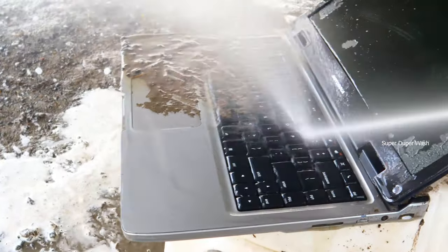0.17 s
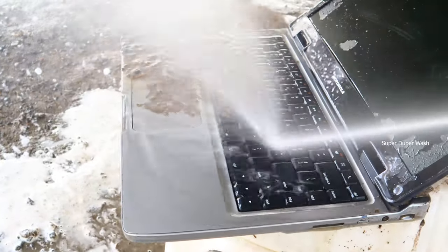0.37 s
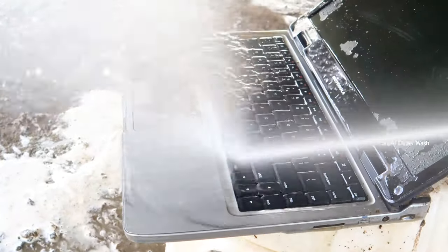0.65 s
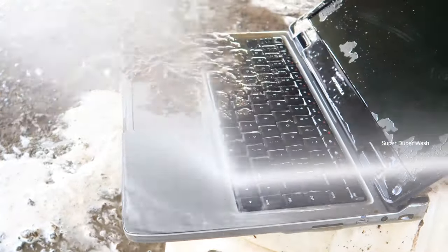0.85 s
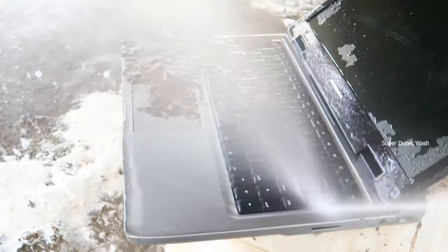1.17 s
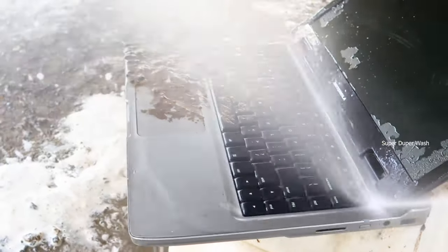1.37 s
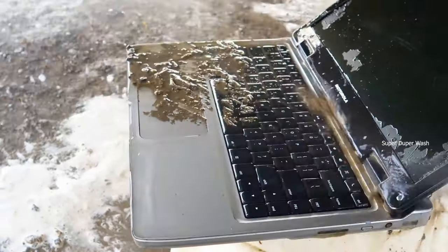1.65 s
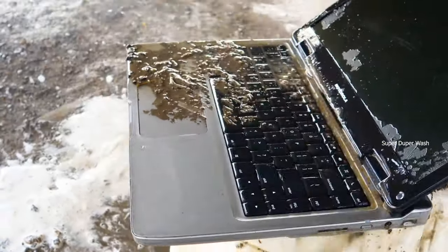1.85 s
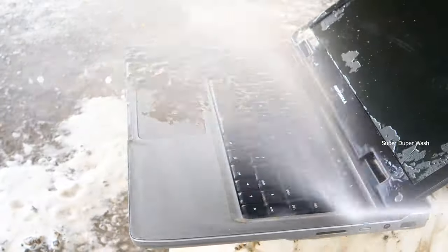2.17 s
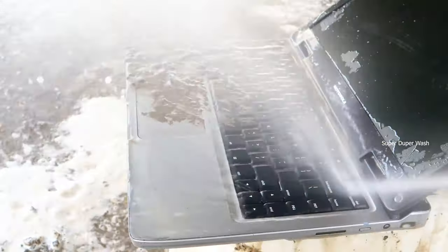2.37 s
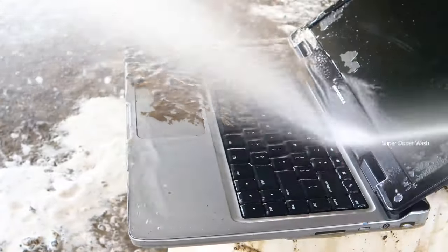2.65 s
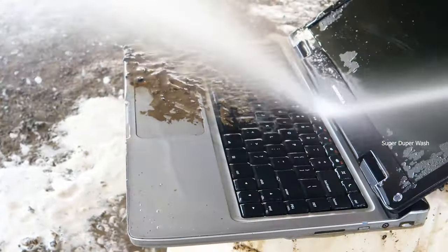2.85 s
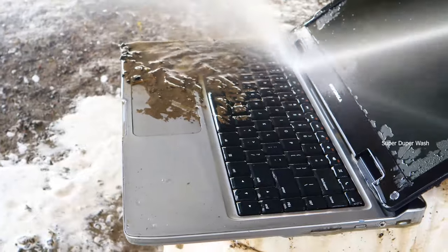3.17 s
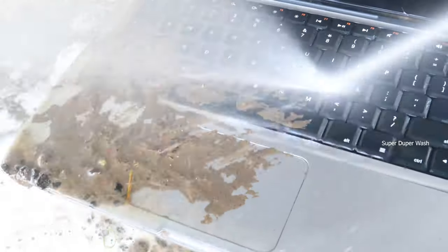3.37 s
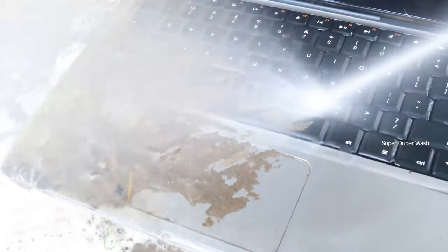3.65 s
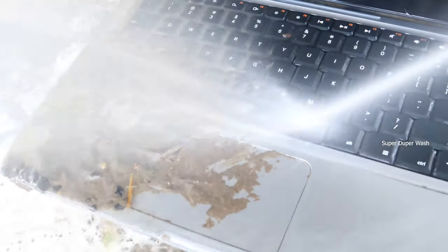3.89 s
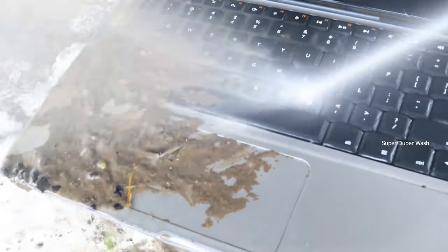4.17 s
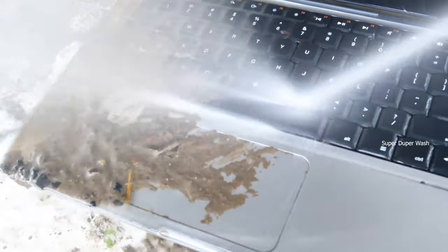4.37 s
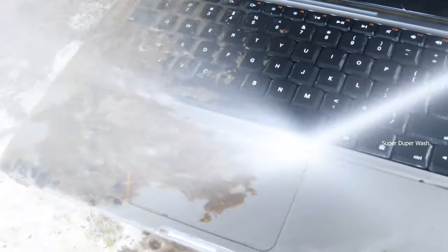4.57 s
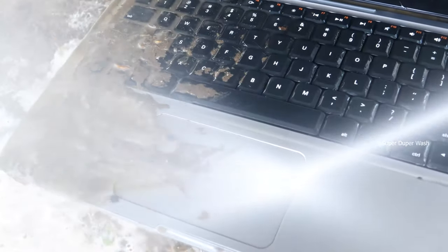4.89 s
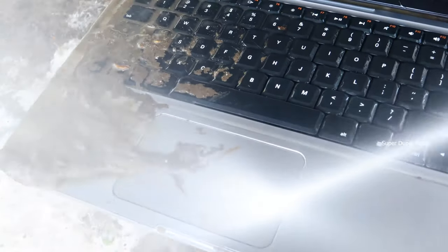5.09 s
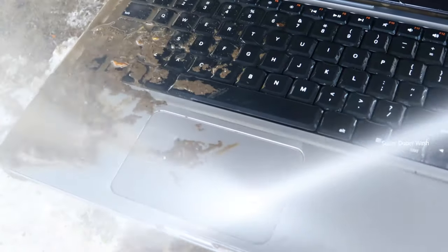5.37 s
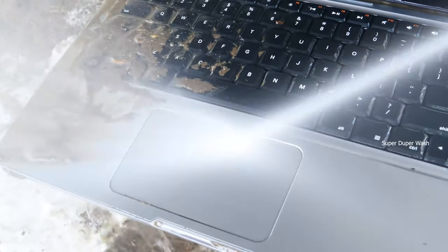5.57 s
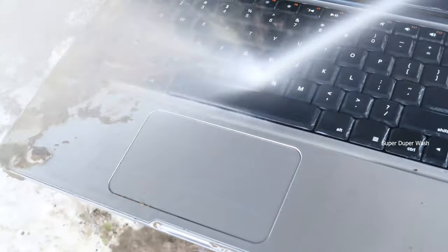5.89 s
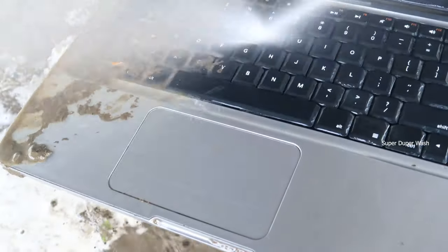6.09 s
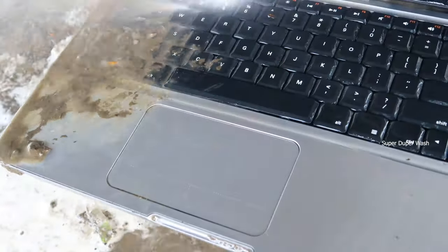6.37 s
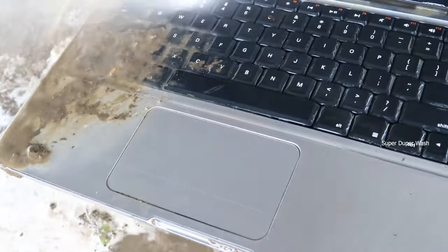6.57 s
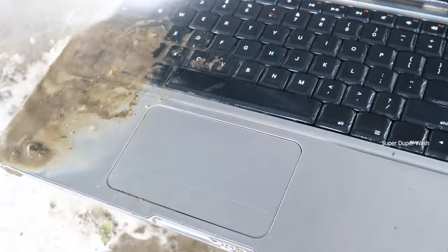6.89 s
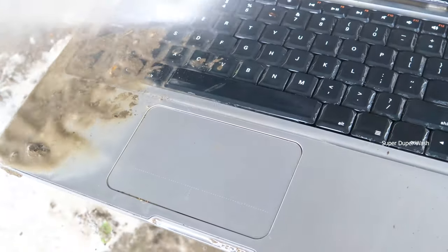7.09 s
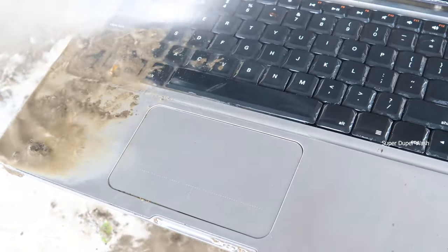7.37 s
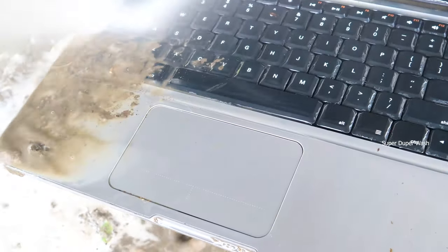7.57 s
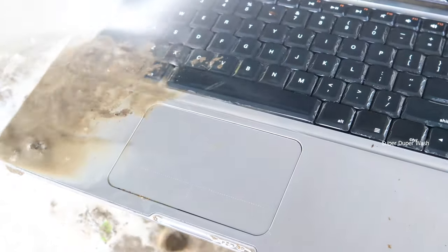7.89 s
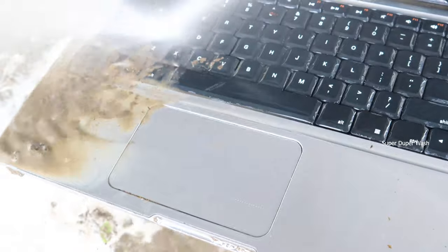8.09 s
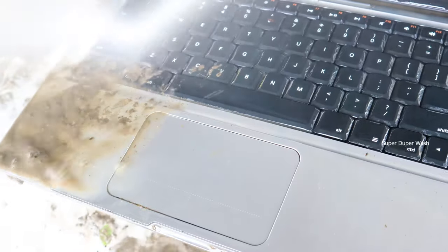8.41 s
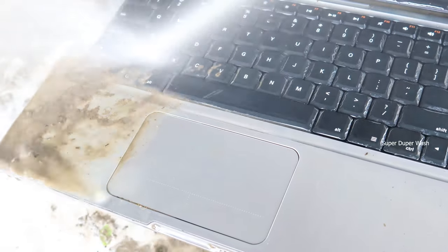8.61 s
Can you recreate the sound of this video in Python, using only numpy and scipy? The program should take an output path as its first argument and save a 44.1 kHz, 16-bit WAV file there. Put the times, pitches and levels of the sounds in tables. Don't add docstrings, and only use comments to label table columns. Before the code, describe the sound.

A pressure-washer jet hisses fiercely over a laptop keyboard outdoors, throbbing and shifting in tone, above a steady motor hum and low roar.

```python
import sys
import numpy as np
from scipy import signal
from scipy.fft import rfft, irfft, next_fast_len
from scipy.io import wavfile
from scipy.ndimage import uniform_filter1d, map_coordinates

SR = 44100
rng = np.random.default_rng(int(sys.argv[2]) if len(sys.argv) > 2 else 0)


def invert_db(x):
    u = np.asarray(x, float) / 20
    return 10 ** u


def wav_record(signal):
    frames = np.transpose(np.atleast_2d(signal))
    bounded = np.clip(frames, -1, 1)
    quanta = np.round(bounded * 32767).astype(np.int16)
    wavfile.write(sys.argv[1], SR, quanta)


N = 385434
HOP = 192

SCENE_CHANGES = [3.396, 5.832]
# (time [s], force of impact [dB], fineness of spray [dB], water pooled on the case [dB])
HAND = [(0.0, -3.5, -0.5, 5), (0.2, 0.95, -1.5, -0.5), (0.9, 2.5, -1.5, 3), (1.3, -0.8, 1.7, 0),
        (1.62, -3, -0.5, 1), (2.15, -4, -1.1, -0.8), (2.45, 1.6, -1.2, 1.5), (2.72, -3.5, -8, 1.5),
        (3.05, -4, -1.5, 4.5), (3.393, -6.5, -3.2, 4), (3.399, -1.1, -1.0, -1.5), (4.45, 0.5, 1, -1.5),
        (4.72, -5.5, -0.3, 2), (5.5, -6.5, -0.4, 2.3), (5.828, -3.5, -2, 6.5), (5.836, 1.5, -0.5, 1.4),
        (6.85, 0.2, 1.8, -0.4), (8.74, 2.05, -1.5, -1)]
# (time [s], left lag [microseconds], left-right likeness [0-1], left-right level [dB])
AIM = [(0.0, 33, 0.4, -7), (0.55, 21, 0.63, -3), (0.85, -22, 0.5, -2), (1.07, 9, 0.46, -3),
       (1.61, 54, 0.66, -7), (2.05, 43, 0.56, -5), (2.66, 46, 0.36, -6), (2.8, 32, 0.44, -7),
       (3.29, 22, 0.72, -4), (3.54, 19, 0.22, -8), (3.85, 22, 0.38, -6), (4.26, 20, 0.6, -7),
       (4.95, 15, 0.12, -5), (5.74, 25, 0.68, -3.5), (5.98, -1, 0.47, -4), (6.11, -10, 0.62, -4.5),
       (6.97, -29, 0.55, 0.5), (8.74, -30, 0.67, 0.5)]
# (resting level [dB], per dB of force [dB], per dB of fineness [dB], per dB of pooling [dB])
ANSWER = [
    (-34, 0.26, 0.31, 1.07),
    (-25, 1.11, -1.02, 0.17),
    (-24.5, 1.46, 0.24, -0.43),
    (-21, 0.85, 1.2, -0.14),
]
# (time [s], length [s], force [dB], fineness [dB])
EDGES = [(0.101, 0.049, 0, -5), (0.185, 0.046, 2.5, 3.5), (0.311, 0.04, 0.8, 6.5), (0.82, 0.022, 4, 0.5),
         (1.011, 0.025, 2.5, 2.5), (1.137, 0.079, 3, 0), (1.442, 0.1, 3, 0.5), (1.601, 0.044, 1.5, 0.5),
         (1.741, 0.023, 4.5, -2), (1.813, 0.046, 4.5, -4), (1.901, 0.04, 2.4, 1.5), (1.958, 0.11, 7, -1.5),
         (2.018, 0.035, 3, -0.5), (2.094, 0.026, 7.5, -2.5), (2.257, 0.066, 1.8, 2.5), (2.475, 0.045, 1, 3),
         (2.522, 0.048, 5, 4), (2.65, 0.083, 0.5, 5), (3.2, 0.1, 3, 0.5), (3.54, 0.1, 1.5, 1.5),
         (3.755, 0.05, 1.5, 2), (4.255, 0.031, 4, -2), (4.51, 0.076, 1.1, -1.5), (5.594, 0.083, 2.5, -3.5),
         (5.886, 0.1, 2.5, -1.5), (5.971, 0.049, 1.5, 2), (6.174, 0.048, 1, -2), (6.702, 0.067, 0, 1),
         (8.24, 0.04, 0.4, 4), (5.835, 0.014, 3, 1.5), (1.264, 0.03, 2.5, 0), (1.332, 0.025, 2, 2),
         (7.623, 0.031, 2.5, 1.5), (7.937, 0.027, 2.5, 1), (6.085, .03, 2, 0), (6.127, 0.023, 0.5, 2),
         (6.22, 0.047, 1, 1), (7.466, .05, -1, 1), (2.377, .05, 0, 1.5), (0.376, .04, 1.5, -0.5),
         (8.143, 0.036, 1.5, 1), (7.818, .06, 0.5, 1), (8.556, 0.023, 0, 2.0)]
# (time [s], length [s], force [dB], fineness [dB])
GAPS = [(0.054, 0.027, -1.7, -3), (0.428, 0.035, 0, 3.5), (0.897, 0.04, 2, -1.5),
        (0.934, 0.061, -5.5, -0.5), (1.212, 0.025, 0.8, -1.5), (2.326, 0.062, -0.5, 2.5),
        (2.575, 0.071, -3.2, 3.5), (2.712, 0.05, -3, 3.1), (2.878, 0.037, -3.5, -0.2),
        (2.968, 0.069, -1.5, -1), (3.647, 0.072, -1.5, -1), (3.882, 0.12, -1.5, 0), (4.07, 0.087, -3.5, -4),
        (4.176, 0.15, -2, -0.5), (4.357, 0.078, -4, -2), (4.57, 0.027, -2, -3), (4.87, 0.083, -2, -1),
        (5.024, 0.09, -1.5, -2), (6.837, 0.04, -1.3, -3), (6.942, 0.025, -1.5, -3.5),
        (7.051, 0.05, -2, -2.5), (7.254, 0.027, -2.5, -1.5), (7.337, 0.043, -4, -0.5),
        (7.555, 0.051, -1.5, -1.5), (7.67, 0.078, -2.5, -3.5), (7.854, 0.06, -0.5, 1), (8.027, 0.2, -2, -1),
        (8.296, 0.029, -3.5, 1.5), (8.463, 0.1, -3, -1.5), (1.296, .03, -1.5, -2.5),
        (2.215, 0.033, 0.5, -1), (4.696, .04, 0, -1.5), (4.8, .06, -1, 2), (5.7, 0.042, -0.5, 0.5),
        (3.337, .04, 0, 0), (6.105, .02, -2.5, -1), (6.304, 0.034, 0, -0.5), (8.11, .03, -0.5, 1.5),
        (8.63, 0.1, -2, 2.5)]
# (time [s], length [s], pitch [Hz],
# width [octaves], level [dB])
HOLLOWS = [(0.078, 0.1, 2700, 0.96, 19), (0.386, 0.054, 3700, 0.55, 12), (0.504, 0.11, 1870, 0.33, 9),
           (0.66, 0.43, 5200, 1, 3.5), (1.13, 0.15, 5470, 0.64, 6.5), (1.47, 0.26, 5260, 0.3, 1.5),
           (1.74, 0.1, 6200, 0.31, 8), (1.81, 0.056, 4360, 0.22, 12), (1.92, 0.46, 3740, 0.19, 9),
           (1.935, 0.2, 2420, 0.31, 7), (1.96, 0.39, 4750, 0.17, 10.5), (2.394, 0.15, 1520, 0.13, 16.5),
           (2.757, 0.13, 2420, 0.55, 15), (2.82, 0.1, 3440, 0.8, 20), (3.1, 0.44, 1830, 0.27, 5),
           (3.217, 0.19, 2580, 0.65, 8), (3.376, 0.061, 2640, 0.6, 14), (3.51, 0.19, 4120, 0.64, 8),
           (4.07, 0.14, 3650, 0.47, 7), (4.117, 0.12, 2200, 0.17, 9), (4.253, 0.071, 5500, 0.43, 10),
           (5.163, 0.58, 1790, 1, 5), (6.15, 0.053, 3680, 0.3, 12.5), (6.671, 0.38, 830, 0.54, 9.5),
           (0.46, 0.4, 870.4, 1, 6.5), (0.955, .15, 1020, 0.56, 10.5), (3.09, 0.22, 1000, 0.55, 8.5),
                (4.36, 0.18, 790, .25, 15), (5.74, 0.15, 1030, 0.27, 7), (5.85, .05, 3260, 1.2, 16),
                (5.9, 0.045, 3340, .7, 8), (6.9, 0.12, 730, .25, 11), (8.22, 0.1, 2270, 0.23, 8),
                (2.954, 0.12, 2900, 0.85, 15), (3.1, 0.14, 1540, 0.67, 3.5), (5.87, .08, 2350, .35, 4.5),
                (3.175, .025, 2400, .6, 5), (6.22, 0.11, 1400, .5, 9), (3.76, .1, 1200, .8, 0),
                (7.814, 0.06, 1700, 0.74, 4), (2.097, 0.036, 5900, 0.2, 12), (1.93, .14, 2780, 0.12, 8),
                (7.65, .12, 3200, 0.72, 4), (1.97, .16, 4100, .08, 4), (1.98, .1, 5320, .08, 5),
                (1.9, .04, 2900, .3, 7), (2.51, .06, 6700, 0.2, 4), (2.56, 0.054, 1640, 0.21, 7),
                (0.52, .04, 4500, .4, 7), (0.67, 0.044, 4800, .4, 3), (0.73, .05, 4700, .3, 5),
                (0.81, .04, 6200, .6, 9), (0.92, 0.026, 5300, .8, 1), (1.255, .04, 6000, .4, 5),
                (4.22, 0.044, 4900, .3, 3), (4.268, .03, 7000, .2, 10), (4.265, .04, 3960, .15, 11),
                (4.9, 0.072, 2700, 0.49, 12), (6.08, .04, 4644, 1.3, 5), (7.1, 0.054, 3888, 0.7, 2),
                (7.82, 0.29, 8500, 0.41, 5.5), (7.94, 0.042, 3500, .7, 6), (8.05, 0.074, 2800, 0.66, 6),
                (8.25, 0.088, 8000, .2, 4), (9, 0.13, 8200, 0.35, 10), (8.4, 0.11, 3300, .6, 4),
                (0.026, .05, 3700, .5, 1)]
# (time [s], length [s], pitch [Hz], width
# [octaves], level [dB])
TINTS = [(7.6, .16, 12500, .45, -4), (8.4, .2, 11000, 0.51, -8), (1.32, 0.16, 9200, .4, -7),
         (1.85, .1, 3000, .3, -2), (7.85, .2, 10700, .25, 0), (2.38, 0.26, 12000, 0.37, 6),
         (7.7, .1, 11500, .4, -4), (2.89, .04, 3200, 1, -4), (3.6, .1, 2700, 0.46, 1),
         (3.32, .05, 4100, .6, -3), (3.9, .2, 11500, .4, 2), (6.9, 0.17, 2200, .4, 3),
         (1.97, .16, 3950, .04, -5), (1.97, .16, 4450, .04, -5), (1.95, .16, 3200, .08, -2)]
# (centre [s], half length [s], echo strength [0-1])
SLOT = (1.95, 0.17, 0.5)
# (frequency [Hz], density [dB per Hz])
DRUM = [(150, -120), (350, -45), (600, -7), (900, -4.5), (1100, -4), (1400, -0.5), (1900, -3), (3000, -14)]
# (frequency [Hz], density [dB per Hz])
SPLASH = [(1000, -35), (1900, -7), (3000, -2.5), (4200, -1), (5200, -5.5), (7000, -19)]
# (frequency [Hz], density [dB per Hz])
FIZZ = [(3500, -18.5), (5000, -7), (6500, -1.5), (7800, -1.5), (9500, -17.5)]
# (frequency [Hz], density [dB per Hz])
MIST = [(6500, -29), (8200, -6.5), (9500, -2.5), (10700, 1), (11800, -5), (13000, -15.5), (16000, -25)]
# (frequency [Hz], left-right level [dB])
PORT_TILT = [(1000, 1.9), (3450, -1), (4800, 2.5), (6500, 0.5), (8600, -1), (10500, 0.5), (12700, 7),
             (15000, 4)]
FLUTTER_DB = 0.52
MIST_FOLLOWS, MIST_PAN_DB, SLOT_PAN_DB = 0.55, -1.5, 5

SHAFT_HZ = 48.69
# (multiple of shaft speed [ratio], level [dB rms])
HUM_TONES = [(1, -73), (2.046, -63.5), (3, -59.5), (5, -63.5), (6, -54), (7, -54), (9, -65.5),
             (10, -54.5), (11, -37.5), (12, -50), (13, -50.5), (14, -55.5), (15, -56.5), (25, -71)]
# (time [s], hum gain [dB], roar level [dB], left lag [microseconds])
MOTOR = [(0, 3.5, -44, 230), (1.0, 2, -43, 230), (1.7, 2, -39.5, 230), (2.3, 1.6, -41.5, 230),
         (2.7, .5, -49, 230), (3.1, 1, -43.5, 230), (3.39, 2.5, -40, 230), (3.41, -1.5, -43, -27),
         (3.8, -2, -41.5, -30), (4.3, -2, -43, -30), (5.6, 0.8, -38.5, -27), (6.5, -0.5, -42.5, -30),
         (6.8, 0.5, -38, -21), (8.74, .3, -39.5, -30)]
# (frequency [Hz], density [dB per Hz])
ROAR = [(10, -80), (25, -44), (40, -30), (50, -22), (85, -17), (200, -10.5), (330, -10), (600, -10),
        (870, -12.5), (1200, -11), (1600, -47), (2600, -120)]
# (frequency [Hz], left-right likeness [0-1])
ROAR_ALIKE = [(25, .99), (60, 1), (130, 0.87), (290, 0.87), (640, 0.64), (1200, 0.05)]

# (time [s], level [dB])
DRAUGHT = [(0.0, -54), (0.39, -51), (1.22, -49), (1.38, -58), (2.51, -54), (2.56, -57), (5.67, -49),
           (6.35, -50), (6.4, -42), (6.5, -59), (6.74, -47), (6.79, -58), (8.52, -51), (8.67, -53),
           (8.72, -45), (8.74, -59)]
# (frequency [Hz], density [dB per Hz])
BUFFET = [(10, -60), (25, -20), (45, -4), (90, -1), (150, -3.5), (260, -32), (400, -120)]

# (time [s], level [dB])
DROPS = [(3.697, -32), (3.721, -28), (3.758, -27.5), (3.803, -27), (3.822, -29), (3.866, -26.5),
         (3.989, -29.5), (4.427, -27.5), (4.446, -34), (4.479, -29), (4.715, -33), (5.972, -24),
         (6.189, -30), (6.217, -23), (6.231, -28), (6.375, -30), (6.391, -21), (6.525, -34), (6.698, -22),
         (6.725, -21.5), (6.768, -27), (6.783, -23), (6.795, -26), (7.104, -34), (7.153, -32), (7.206, -30),
         (7.309, -28), (7.401, -27), (7.81, -33), (8.245, -27)]
THUMP_DB, THUMP_HZ = -9.5, 91

# (time [s], top [Hz])
MID_TOP = [(0, 12800), (.2, 14900), (1.26, 15300), (1.4, 13400), (1.95, 10830), (2.2, 12340), (2.36, 14400),
           (2.45, 13100), (2.75, 13500), (3.1, 15300), (3.41, 15200), (3.46, 13500), (3.85, 14200),
           (4.15, 13900), (4.4, 15500), (4.6, 14900), (4.9, 15700), (8.74, 15600)]
HOLES, FRAY_HZ = 0.012, 900


def unit(x):
    return x / np.sqrt(np.mean(np.abs(x) ** 2) + 1e-20)


def along(points, hz):
    f, value = np.transpose(points)
    return np.interp(np.log(hz + 1), np.log(f + 1), value)


def curves(rows, t):
    s, *columns = np.transpose(rows)
    return [np.interp(t, s, column) for column in columns]


def wobble(rate):
    step = min(SR / rate / 8, 200)
    coarse = np.arange(0, N + step, step)
    knots = rng.standard_normal(int(N * rate / SR) + 4)
    smooth = map_coordinates(knots, [coarse * rate / SR])
    return np.interp(np.arange(N), coarse, smooth)


def filtered(x, response):
    m = next_fast_len(N + 8192)
    hz = np.fft.rfftfreq(m, 1 / SR)
    return irfft(rfft(x, m) * response(hz), m)[..., :N]


def frames(x):
    hz, t, z = signal.stft(x, SR, nperseg=512, noverlap=512 - HOP)
    return hz[:, None], t, z


def ports(z, hz, alike, lag_us, pan_db):
    alike = np.clip(alike, 0, 1)
    half = invert_db(pan_db / 2) * np.exp(-1j * np.pi * hz * lag_us / 10 ** 6)
    pair = np.sqrt(alike) * z[0] + np.sqrt(1 - alike) * z[1:]
    return signal.istft(pair * [half, 1 / half], SR, nperseg=512, noverlap=512 - HOP)[1][:, :N]


def passing(t, s, length):
    same_view = np.digitize(t, SCENE_CHANGES)[:, None] == np.digitize(s, SCENE_CHANGES)
    return same_view * np.exp(-2.8 * ((t[:, None] - s) / length) ** 2)


def layers(t):
    force, fine, pool = curves(HAND, t)
    s, length, force_db, fine_db = np.transpose(EDGES + GAPS)
    bump = passing(t, s, length)
    drive = [1 + 0 * t, force + bump @ force_db, fine + bump @ fine_db, pool]
    flutter = [map_coordinates(rng.standard_normal(200), [t * 16]) for _ in ANSWER]
    return np.array(ANSWER) @ drive + FLUTTER_DB * np.array(flutter)


def jet():
    stroke = 2 * np.pi * 3 * SHAFT_HZ * np.arange(N) / SR
    throb_db = np.cos(stroke) + 0.31 * np.cos(2 * stroke + 0.66) + 0.35 * np.cos(3 * stroke + 1.5)
    sheet = invert_db(0.34 * throb_db + 0.62 * wobble(40))
    surge = invert_db(0.68 * throb_db)
    torn = surge * invert_db(0.95 * wobble(50) + 1.5 * wobble(900))
    hz, t, low = frames(unit(sheet * rng.standard_normal((3, N))))
    high = frames(unit(torn * rng.standard_normal((3, N))))[2]

    s, length, pitch_hz, octaves, db = np.transpose(HOLLOWS + TINTS)
    bells = np.exp(-3.0 * (np.log2((hz + 1) / pitch_hz) / octaves) ** 2)
    ring_db = db * bells @ passing(t, s, length).T
    echo = SLOT[2] * np.exp(-((t - SLOT[0]) / SLOT[1]) ** 4)
    delayed = np.exp(-2j * np.pi * hz / 595) / (1 + (hz / 7000) ** 4)
    comb = np.abs(1 + echo * delayed)

    shapes = [invert_db(along(colour, hz) + ring_db) for colour in (DRUM, SPLASH, FIZZ, MIST)]
    drum_power = np.mean(invert_db(along(DRUM, hz)) ** 2)
    powers = [drum_power] + [np.mean(shape ** 2, 0) for shape in shapes[1:]]
    drum, splash, fizz, mist = (invert_db(level_db) ** 2 * shape ** 2 / power
                                for level_db, shape, power in zip(layers(t), shapes, powers))

    patches = uniform_filter1d(rng.standard_normal(low.shape[1:]), 6, 0)
    patches = uniform_filter1d(patches, 11, 1)
    patch_db = 1.8 * np.tanh(unit(patches) / 2)
    spray = low * np.sqrt(drum + splash) + high * np.sqrt(fizz + mist)
    spray = spray * comb * invert_db(patch_db - 0.2)

    lag_us, alike, splash_pan = curves(AIM, t)
    slot_pan = SLOT_PAN_DB * np.exp(-((t - SLOT[0]) / 0.27) ** 2)
    mist_pan = MIST_FOLLOWS * splash_pan + MIST_PAN_DB + slot_pan
    pan_db = np.where(hz < 6500, splash_pan, mist_pan) + along(PORT_TILT, hz)
    direct = along([(1000, 1.02), (2500, 0.92), (6000, 1.12), (9500, 1.38), (13500, 1.07)], hz)
    return ports(spray, hz, alike * direct, lag_us, pan_db)


def motor():
    t = np.arange(N) / SR
    hum_db, roar_db, lag_us = curves(MOTOR, t)
    drift = np.cumsum(0.00056 * wobble(2.52)) / SR
    port_lag = np.array([[0.5], [-0.5]]) * lag_us / 10 ** 6
    turn = 2 * np.pi * SHAFT_HZ * (t + drift - port_lag)
    hum = sum(invert_db(db + 2 + 0.99 * wobble(5.4)) * np.sin(k * turn + rng.uniform(0, 7.2))
              for k, db in HUM_TONES)

    def mid_side(hz):
        spread = np.arccos(np.clip(along(ROAR_ALIKE, hz), 0, 1)) / 2
        return invert_db(along(ROAR, hz)) * [np.cos(spread), np.sin(spread)]

    mid, side = filtered(rng.standard_normal((2, N)), mid_side)
    roar = unit(invert_db([[-0.4], [0.4]]) * [mid + side, mid - side])
    knock = invert_db(1.0 * np.cos(turn) + 1.2 * np.cos(3 * turn))
    return invert_db(hum_db + [[0.8], [-0.8]]) * hum + invert_db(roar_db + 0.94 * wobble(3.05)) * knock * roar


def draught():
    level_db, = curves(DRAUGHT, np.arange(N) / SR)
    mid, side = filtered(rng.standard_normal((2, N)), lambda hz: invert_db(along(BUFFET, hz)))
    buffeting = unit(mid + 0.1 * side * np.array([[1], [-1]]))
    return invert_db(level_db - 1.5 + 1.2 * wobble(14)) * buffeting


def drops():
    s, db = np.transpose(DROPS)
    luck = rng.random((len(s), 3, 7))
    at = (s[:, None] + 0.015 * (luck[:, 0] - 0.5)) * SR
    push_or_pull = np.sign(luck[:, 1] * 7 % 1 - 0.5)
    size = invert_db(db[:, None] + 35.5 - 8.9 * luck[:, 1]) * push_or_pull
    at = at.astype(int) + N * (np.arange(7) % 2)
    taps = np.bincount(at.ravel(), size.ravel(), 2 * N).reshape(2, N)
    tap = filtered(taps, lambda hz: (1j * hz / (290 + 1j * hz)) ** 2 / (1 + 1j * hz / 2200) ** 2)
    thump = filtered(taps.sum(0), lambda hz: 1j * hz * 90 / (THUMP_HZ ** 2 - hz ** 2 + 1j * hz * 90))
    return tap + invert_db(THUMP_DB) * thump


def scene():
    spray = filtered(jet(), lambda hz: hz ** 4 / (hz ** 4 + 260 ** 4))
    return spray + motor() + draught() + drops()


def top_cut(x):
    return signal.sosfilt(signal.butter(12, 15890, fs=SR, output="sos"), x)


def record(dry):
    hz, t, z = signal.stft([dry[0] + dry[1], dry[0] - dry[1]], SR, nperseg=1024)
    hz = hz[:, None]
    ragged = np.repeat(rng.standard_normal((2, len(t))), 3, 1)[:, :len(t)]
    top_hz = np.array([curves(MID_TOP, t)[0], 15300 + 0 * t]) + 380 * ragged
    tiles = rng.random((2, len(hz) // 6 + 1, len(t) // 3 + 1))
    tiles = np.repeat(np.repeat(tiles, 6, 1), 3, 2)[:, :len(hz), :len(t)]
    top_hz = top_hz[:, None]
    lost = HOLES * (hz > 4500) + 0.5 * np.exp(np.minimum(hz - top_hz, 0) / FRAY_HZ)
    kept = (hz < np.minimum(top_hz, 15850)) * (tiles > lost)
    mid, side = signal.istft(z * kept, SR, nperseg=1024)[1][:, :N] / 2
    return top_cut(np.array([mid + side, mid - side]))


dry = scene()
out = record(dry)
wav_record(out)
```